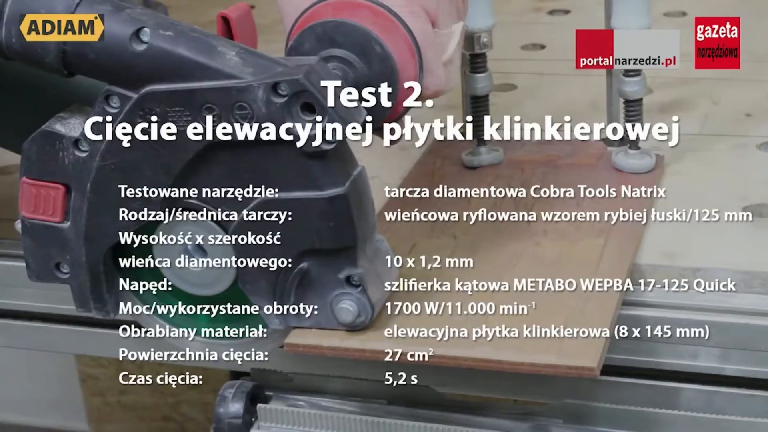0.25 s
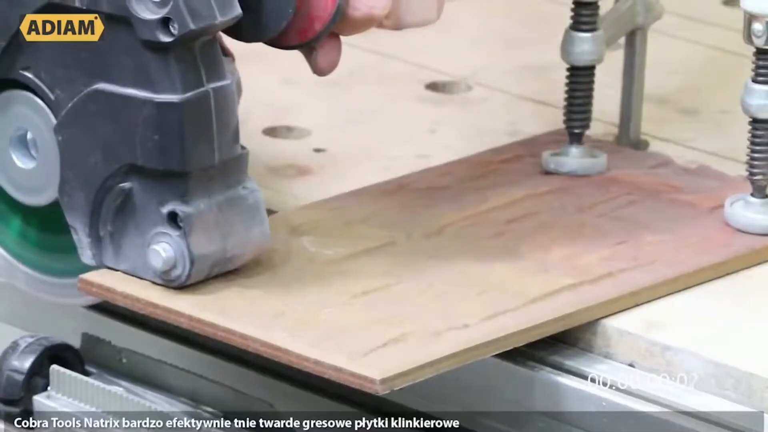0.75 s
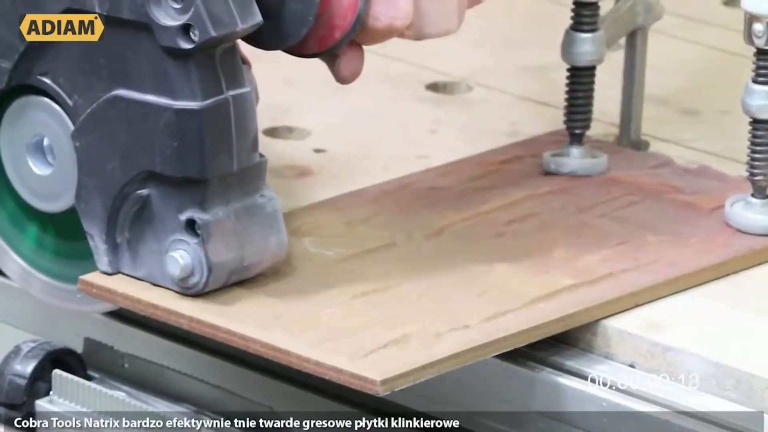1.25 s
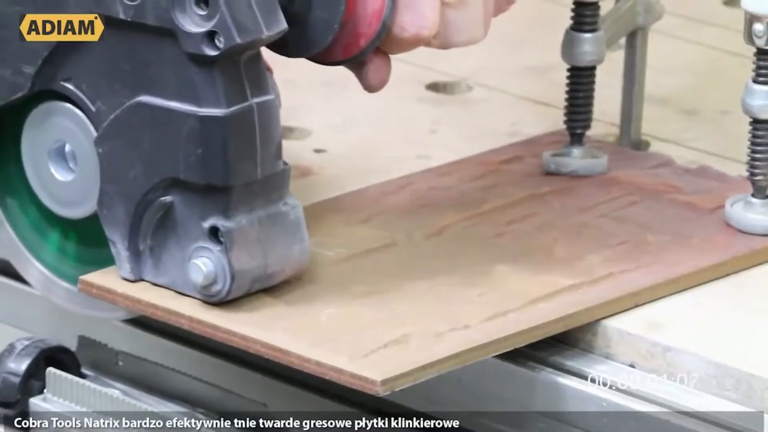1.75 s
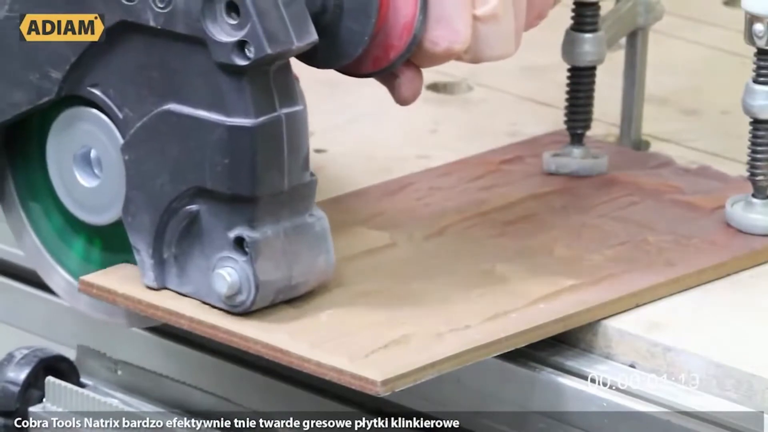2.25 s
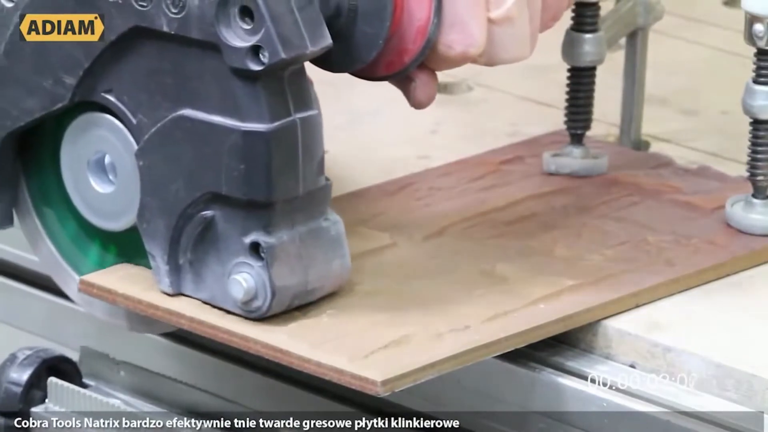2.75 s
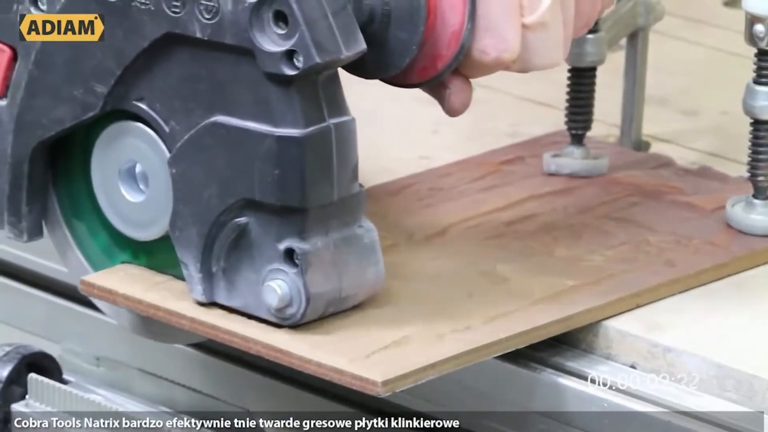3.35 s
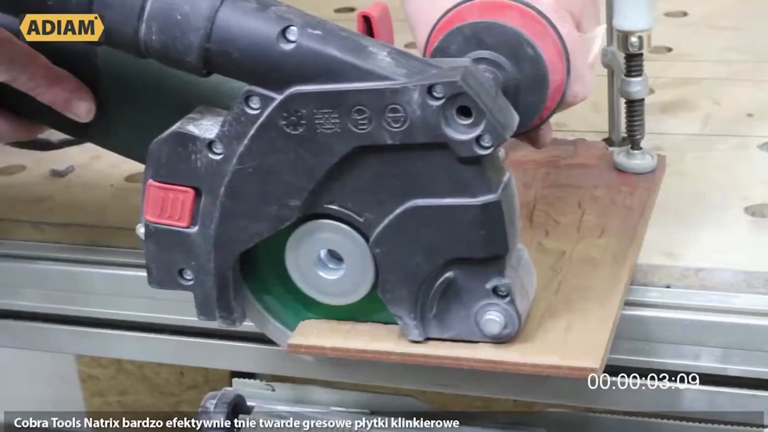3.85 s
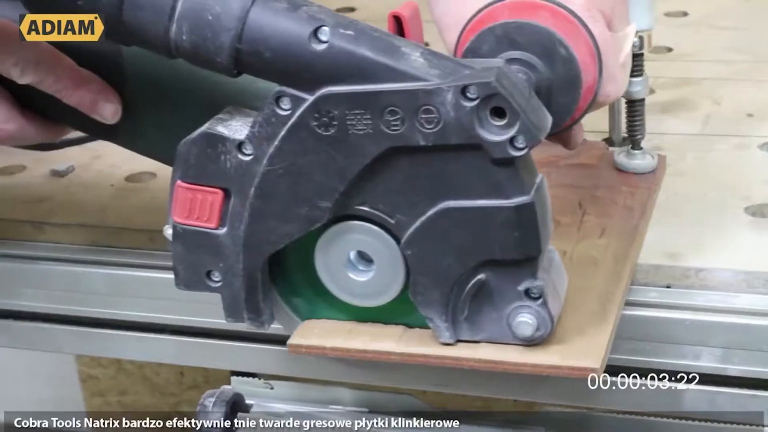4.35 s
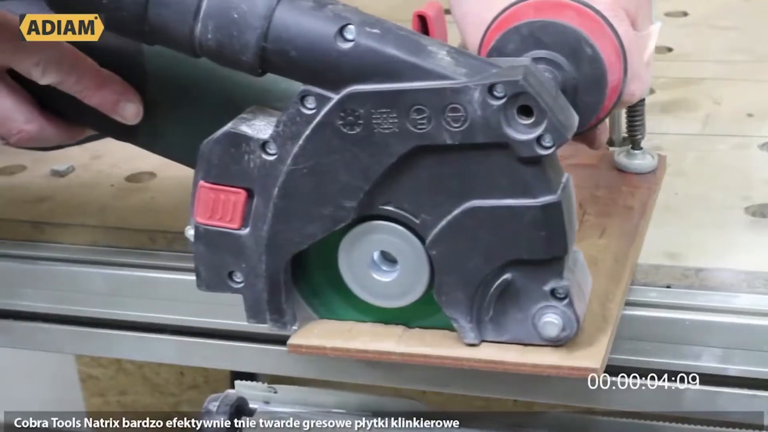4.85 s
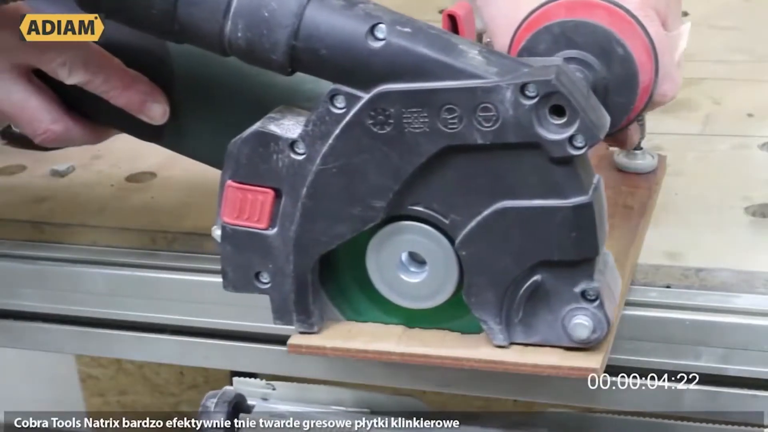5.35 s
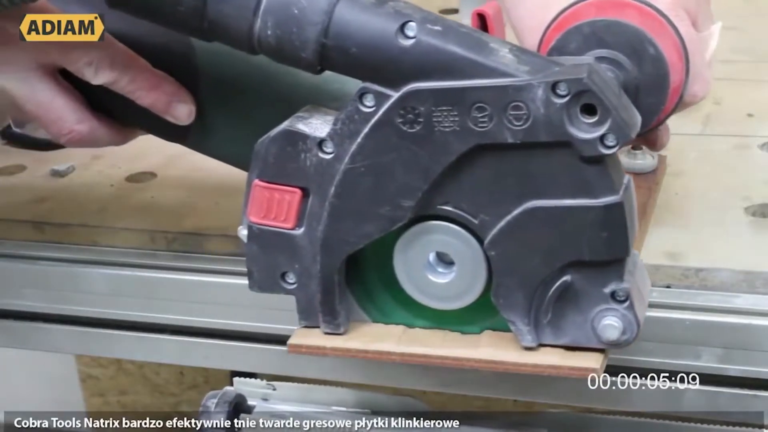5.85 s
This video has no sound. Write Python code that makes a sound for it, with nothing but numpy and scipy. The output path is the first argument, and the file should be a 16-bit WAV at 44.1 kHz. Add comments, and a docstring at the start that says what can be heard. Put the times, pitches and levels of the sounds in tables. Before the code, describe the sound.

From 0 to 0.6 seconds there is silence. Then an already running grinder cut fades in smoothly, reaching full level around 1.6 seconds: a diamond disc tearing hard tile, a dense, very bright hiss over a coarse midrange rasp. A whine near 2 kilohertz wavers over it, jumping out briefly around 1.3 and strong again near 3.2. Low bench rumble fills in after about 1.3. Short buzzing chatters stand out near 2 and 2.3. Around 2.6 and 3.6 the hand eases, the rumble drops away and the rasp sharpens for a moment. From 4 seconds the cut sounds fuller and more hollow from the guard, with thin high metallic ringing swelling and more chatter near 5, 5.4 and 5.8. The whine dips near 5.1 and rises at the end. Close, dry, centred mono; the grinding never stops and ends mid-cut near 6 seconds.

```python
"""Angle grinder cutting tile

A diamond disc tears through a hard tile, heard close up in mono: silence, then a fade-in on the running cut.
Noise stands for the tearing grit: part is fresh, part returns every turn and draws lines at shaft multiples.
Filters turn that force into bare hiss, tile rasp, dust-guard colour and bench rumble.
Narrow modes of the disc, with some of the tile and guard, ring and swell as the cut clamps in new places.
Unsteady cosines on multiples of the shaft rate add the whine and the rim chatter."""
import sys
import numpy as np
from scipy import signal
from scipy.fft import rfft, irfft, next_fast_len
from scipy.io import wavfile
from scipy.ndimage import uniform_filter1d, map_coordinates

SR = 44100
rng = np.random.default_rng(int(sys.argv[2]) if len(sys.argv) > 2 else 0)


def wav_record(signal):
    """Record a signal, one row per channel, as 16-bit PCM in the file named by sys.argv[1]."""
    frames = np.transpose(np.atleast_2d(signal))
    bounded = np.clip(frames, -1, 1)
    # unit amplitude maps onto the largest positive 16-bit level
    quanta = np.round(bounded * 32767).astype(np.int16)
    wavfile.write(sys.argv[1], SR, quanta)


N = 269054

# shaft speed: [t/s, turns per second f/Hz]
SHAFT_SPEED = [(0.7, 157.5), (1.07, 154.0), (1.6, 156.0), (1.95, 157.3), (2.5, 157.5), (2.71, 162.4),
               (2.82, 162.2), (3.1, 157.9), (3.22, 157.4), (3.35, 159.1), (3.7, 161.8), (3.92, 158.5),
               (4.3, 157.3), (4.65, 157.2), (4.8, 156.2), (5.05, 156.1), (5.55, 157.8), (6.1, 158.9)]
# spans where the hand eases off and the cut softens: [start t/s, end t/s]
EASED_SPANS = [(2.55, 2.74), (3.5, 3.74)]
# colour of the grit hiss: [f/Hz, relative level/dB]
GRIT_COLOUR = [(25, -76), (112, -25.5), (318, -15.5), (900, -12.5), (1600, -10.5), (2600, -9), (4800, -11),
               (8100, -13.5), (9200, -10.5), (12300, -3.5), (14300, -6.5), (14850, -10), (15400, -9.5),
               (15900, -10), (16500, -60)]
# resonances of the hollow dust guard: [f/Hz, width of a single pass f/Hz, relative level/dB]
GUARD_MODES = [(5490, 860, -8), (6380, 830, -9), (7180, 750, -8.5), (8500, 280, -7)]
# narrow ringing modes of the disc, with some of the tile and guard: [f/Hz, width f/Hz, relative level/dB]
RINGING_MODES = [(5470, 28, -37), (6320, 55, -30), (6970, 55, -31), (7510, 40, -32), (8500, 55, -31),
                 (10170, 45, -34), (10745, 70, -34), (11430, 55, -30), (11886, 60, -33), (12110, 60, -33),
                 (13140, 50, -32), (13850, 55, -31), (14534, 60, -39), (15267, 100, -35), (3000, 120, -40),
                 (3380, 120, -40), (3800, 120, -41), (4400, 120, -41), (5650, 50, -35), (6050, 55, -34),
                 (6620, 60, -34), (12430, 60, -35)]
# spans where a ringing mode sings out: [start t/s, end t/s, row in RINGING_MODES from 0]
SINGING_SPANS = [(0.63, 0.99, 8), (0.63, 1.68, 5), (0.63, 2.48, 4), (0.64, 1.05, 3), (0.72, 1.47, 11),
                 (1.3, 2.4, 19), (1.4, 2.55, 18), (1.48, 2.73, 7), (1.58, 1.97, 8), (1.77, 1.99, 9),
                 (2.39, 2.7, 11), (2.8, 4.1, 3), (3.25, 3.75, 15), (3.85, 5.75, 11), (4.03, 5.08, 6),
                 (4.17, 6.1, 4), (4.23, 5.3, 0), (4.2, 6.1, 2), (4.28, 5.27, 13), (4.3, 5.5, 20),
                 (4.86, 5.81, 10), (5.15, 6.1, 7), (5.49, 6.1, 1), (2.75, 3.4, 20)]
# whine near 2 kHz: [t/s, level/dB]
WHINE_LEVEL = [(0.65, -32), (1.17, -31.5), (1.26, -16.5), (1.36, -31), (1.52, -32.5), (1.65, -24.5),
               (2.27, -24.5), (2.6, -22.5), (2.68, -30.5), (3.0, -24.5), (3.18, -19.5), (3.3, -24.5),
               (3.55, -32), (3.77, -44), (3.9, -26.5), (5.03, -26.5), (5.15, -42), (5.72, -33), (5.85, -31),
               (6.05, -23)]
# spans where the rim chatters: [start t/s, end t/s, multiple of the shaft rate, level/dB]
CHATTER_SPANS = [(0.67, 1.15, 12, -32.5), (0.85, 1.08, 11, -34), (0.87, 1.48, 6, -41),
                 (0.89, 1.61, 9, -39.5), (0.91, 1.49, 10, -37.5), (1.05, 1.47, 19, -33.5),
                 (1.229, 1.9, 4, -43), (1.5, 1.65, 14, -37), (1.39, 1.906, 16, -36), (1.222, 1.75, 11, -37),
                 (1.51, 1.75, 15, -39), (1.71, 2.4, 9, -37), (1.72, 2.62, 14, -33), (1.927, 2.133, 14, -25),
                 (2.217, 2.425, 14, -23), (2.35, 2.573, 29, -30), (2.26, 2.47, 15, -30),
                 (2.85, 3.57, 9, -40), (2.95, 3.347, 8, -35), (2.987, 3.29, 16, -32), (3.21, 3.59, 18, -31),
                 (3.49, 3.69, 21, -37), (3.52, 3.72, 14, -34.5), (3.812, 4.95, 7, -36.5),
                 (2.85, 3.29, 6, -42), (3.85, 4.5, 6, -42), (3.87, 4.432, 8, -37.5), (4.22, 4.6, 15, -33),
                 (4.48, 4.72, 11, -32.5), (4.48, 4.72, 14, -36), (4.826, 5.296, 8, -34),
                 (4.844, 5.205, 11, -32.5), (4.87, 5.37, 12, -33), (4.96, 5.1, 14, -27),
                 (5.27, 5.45, 15, -28), (5.31, 5.565, 11, -28), (5.3, 5.7, 14, -34.5), (5.5, 6.1, 15, -36),
                 (5.74, 5.967, 14, -26.5), (5.475, 6.052, 7, -38.5), (5.72, 6.095, 11, -33),
                 (5.7, 5.9, 16, -35)]

# starting levels, dB: tearing force, tile body, tile rasp, guard, bench
FEED_DB, BODY_DB, RASP_DB, GUARD_DB, BENCH_DB = -13.5, 1.5, 0.5, -4, 3
# as the cut deepens the body and guard grow and the rasp dulls
BODY_DB_PER_S, GUARD_DB_PER_S, RASP_DB_PER_S = 0.5, 0.6, -0.26
# level changes under a light hand, dB: the rasp sharpens and the bench falls away
EASE_FEED_DB, EASE_BODY_DB, EASE_RASP_DB, EASE_GUARD_DB, EASE_BENCH_DB = -2.05, 2, 3.5, 1, -17
ENTRY_S, ENTRY_BENCH_DB = 1.25, -14  # until the disc is well into the tile the bench hardly rumbles
GUARD_WANDER_DB, BODY_WANDER_DB = -0.5, 1.27
BENCH_TOP_HZ, BODY_TOP_HZ, RASP_TOP_HZ = 230.0, 1650, 5100.0  # edges between the bands of the cut
TILE_HZ, TILE_WIDTH_HZ, TILE_DB = 2098, 387, -2.5  # tile resonance; width of a single pass
CUT_TRIM_DB, RING_TRIM_DB, SING_DB = 5.0, -4.0, 4.5
DRIVE = 1.33  # how hard the peaks are rounded
FADE_START_S, FADE_S, TOP_HZ = 0.6, 1.02, 15700


def grit(turns, memory_turns=12.5, repeat=0.17):
    """White tearing force: the rim profile wears away over some turns, fresh grains never repeat."""
    # one row per turn, 1024 points around the rim
    grains = rfft(rng.standard_normal((int(turns[-1]) + 200, 1024)), axis=1)
    # the profile holds multiples 4 to 104 of the shaft rate
    grains[:, :4] = grains[:, 105:] = 0
    worn = signal.lfilter([1], [1, -np.exp(-1 / memory_turns)], grains, axis=0)
    rim = irfft(worn[100:], axis=1)  # drop the turns where the wear is still settling
    rim = np.hstack([rim, rim[:, :1]])  # close the circle
    returning = map_coordinates(rim, [turns, turns % 1 * 1024], order=1)
    fresh = rng.standard_normal(N)
    return np.sqrt(repeat) * unit(returning) + np.sqrt(1 - repeat) * fresh


def grit_hiss(force):
    """The tearing force takes on the broad colour of the cut."""
    hz, db = np.transpose(GRIT_COLOUR)
    return shape(force, lambda f: undb(np.interp(np.log(f), np.log(hz), db)))


def tile(force, hiss, turns, body_db, rasp_db, throb=0.033):
    """The tile passes low body and midrange rasp, with one resonance excited by the force."""
    low = below(hiss, BODY_TOP_HZ)
    body = undb(body_db) * (low - below(hiss, BENCH_TOP_HZ))
    ring = shape(force, lambda f: undb(TILE_DB) * peak(f, TILE_HZ, TILE_WIDTH_HZ) ** 2)
    # the rasp is uneven as the grit catches
    rasp = undb(rasp_db + 1.1 * walk(12.)) * (below(hiss, RASP_TOP_HZ) - low + ring)
    # the disc runs slightly out of true and bites harder once a turn
    bite = 1 + throb * np.cos(2 * np.pi * turns)
    return bite * (body + rasp)


def dust_guard(force, guard_db):
    """The hollow guard resonates in a few broad modes, added by power."""
    def gain(f):
        return np.sqrt(sum((undb(db) * peak(f, hz, width) ** 2) ** 2 for hz, width, db in GUARD_MODES))
    return undb(guard_db) * shape(force, gain)


def ringing(force, wander_db=3.5):
    """Each narrow mode rings with the force, wanders slowly and swells where it sings."""
    total = 0
    for k, (hz, width_hz, db) in enumerate(RINGING_MODES):
        singing = sum(swell(start, end, 0.18) for start, end, mode in SINGING_SPANS if mode == k)
        mode_db = db + wander_db * walk(2.99) + SING_DB * singing
        mode_ring = unit(shape(force, lambda f: peak(f, hz, width_hz)))
        total = total + undb(mode_db) * mode_ring
    return total * undb(RING_TRIM_DB)


def whine(turns):
    """The 13th multiple of the shaft rate, the one the tile rings with most."""
    return undb(curve(WHINE_LEVEL)) * tone(turns, order=13, flutter_db=1.8)


def chatter(turns):
    """The rim chatters on multiples of the shaft rate that stand out for a while."""
    total = 0
    for order in sorted({row[2] for row in CHATTER_SPANS}):
        spans = [row for row in CHATTER_SPANS if row[2] == order]
        level = sum(undb(db) * swell(start, end, 0.16) for start, end, _, db in spans)
        total = total + tone(turns, order, flutter_db=3.5) * level
    return total


def bench(hiss, bench_db):
    """The bench carries the lowest part of the cut as an uneven rumble."""
    return undb(3.5 * walk(6.4) + bench_db) * below(hiss, BENCH_TOP_HZ)


def tone(turns, order, flutter_db, drift_rad=0.62):
    """One multiple of the shaft rate, unsteady in strength and phase; rms near 1 before flutter."""
    flutter = undb(flutter_db * walk(25.07))
    phase = 2 * np.pi * order * turns + drift_rad * walk(12.)
    return np.sqrt(2) * flutter * np.cos(phase)


def undb(db):
    """Decibels to amplitude."""
    return 10 ** (np.asarray(db) / 20)


def unit(x):
    """Scale to an rms of 1."""
    return x / np.sqrt(np.mean(np.abs(x) ** 2))


def shape(x, gain):
    """Filter by a gain given as a function of frequency."""
    size = next_fast_len(N)
    hz = np.arange(size // 2 + 1) * SR / size + 1e-3  # kept above 0 for the logarithm
    return irfft(rfft(x, size) * gain(hz), size)[:N]


def below(x, edge_hz):
    """The part of a sound under an edge, halved in amplitude at the edge."""
    return shape(x, lambda f: 1 / (1 + (f / edge_hz) ** 4))


def peak(hz, centre_hz, width_hz):
    """Gain of one resonance, 1 at its centre."""
    return 1 / np.sqrt(1 + (2 * (hz - centre_hz) / width_hz) ** 2)


def walk(rate):
    """Random levels held 1 / rate s and smoothed twice; spread near 1."""
    hold = int(SR / rate)
    steps = np.repeat(rng.standard_normal(N // hold + 1), hold)
    return 1.44 * uniform_filter1d(uniform_filter1d(steps, hold), hold)[:N]


def swell(start, end, edge):
    """0 outside the span, 1 inside, with soft edges; all times in s."""
    t = np.arange(N) / SR
    return np.clip(np.minimum(t - start, end - t) / edge + 0.5, 0, 1) ** 2


def curve(table):
    """Straight lines between timed values, one value a sample."""
    s, values = np.transpose(table)
    return np.interp(np.arange(N) / SR, s, values)


def scene():
    """Entry, depth of cut and the hand's pressure set the layers; both channels are the same."""
    t = np.arange(N) / SR
    turns = np.cumsum(curve(SHAFT_SPEED)) / SR
    eased = sum(swell(start, end, 0.11) for start, end in EASED_SPANS)
    entering = swell(0, ENTRY_S, 0.46)

    force = grit(turns) * undb(FEED_DB + EASE_FEED_DB * eased + 0.5 * walk(9.))
    body_db = BODY_DB + BODY_DB_PER_S * t + EASE_BODY_DB * eased + BODY_WANDER_DB * walk(6.)
    guard_db = GUARD_DB + GUARD_DB_PER_S * t + EASE_GUARD_DB * eased + GUARD_WANDER_DB * walk(5.)
    bench_db = BENCH_DB + EASE_BENCH_DB * eased + ENTRY_BENCH_DB * entering
    rasp_db = RASP_DB + RASP_DB_PER_S * t + EASE_RASP_DB * eased

    hiss = grit_hiss(force)
    cut = hiss - below(hiss, RASP_TOP_HZ)  # the treble comes straight from the cut
    cut = cut + tile(force, hiss, turns, body_db, rasp_db)
    cut = cut + dust_guard(force, guard_db)
    cut = cut + bench(hiss, bench_db)
    sound = undb(CUT_TRIM_DB) * cut + ringing(force) + whine(turns) + chatter(turns)
    return np.array([sound, sound])


def record(dry):
    """Peaks are rounded and the bass thinned; silence, then a quarter-sine fade-in; the top is cut."""
    rounded = np.tanh(DRIVE * dry) / DRIVE
    thin = signal.sosfilt(signal.butter(2, 70., "high", fs=SR, output="sos"), rounded)
    progress = np.clip((np.arange(N) / SR - FADE_START_S) / FADE_S, 0, 1)
    faded = thin * np.sin(np.pi / 2 * progress)
    top_cut = signal.ellip(10, 0.1, 55, TOP_HZ, fs=SR, output="sos")
    return signal.sosfiltfilt(top_cut, faded)


dry = scene()
out = record(dry)
wav_record(out)
```